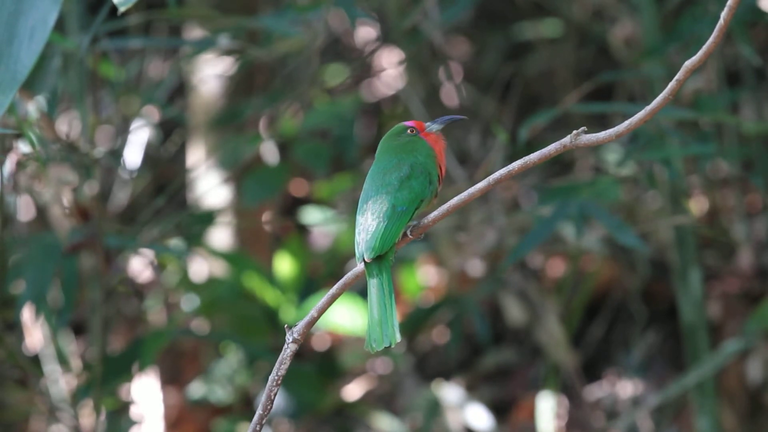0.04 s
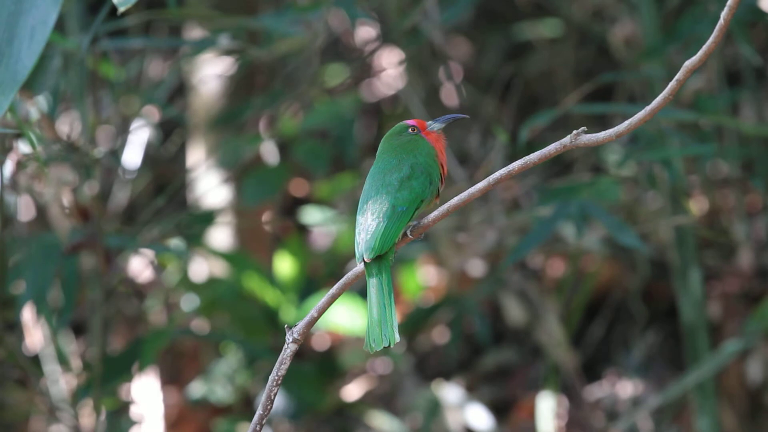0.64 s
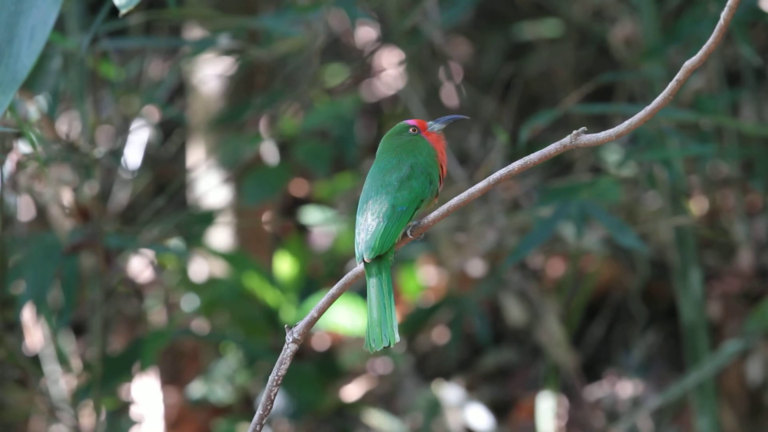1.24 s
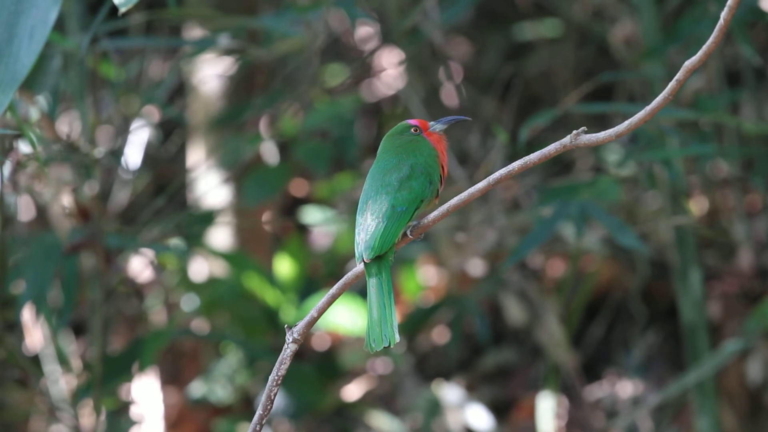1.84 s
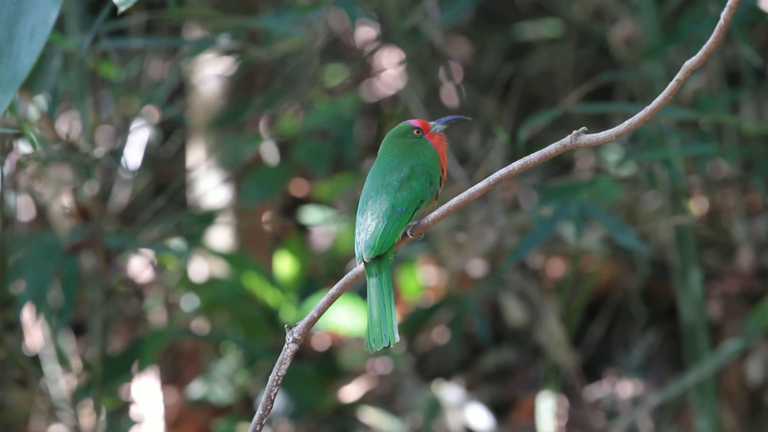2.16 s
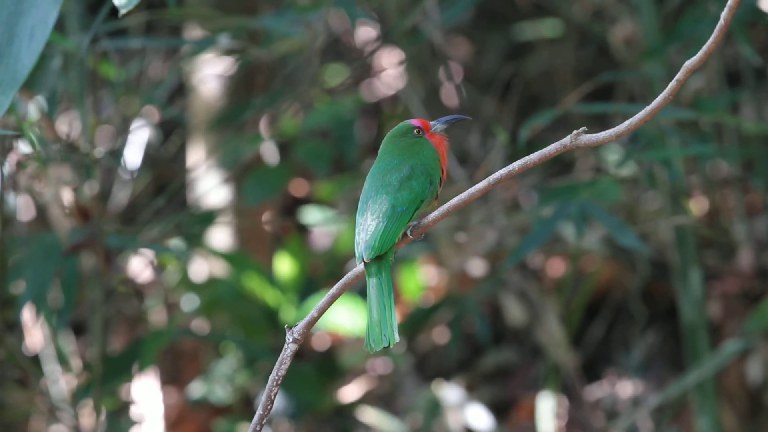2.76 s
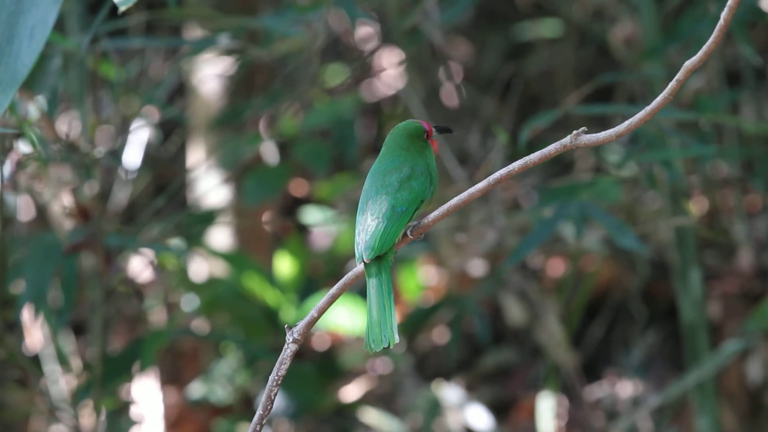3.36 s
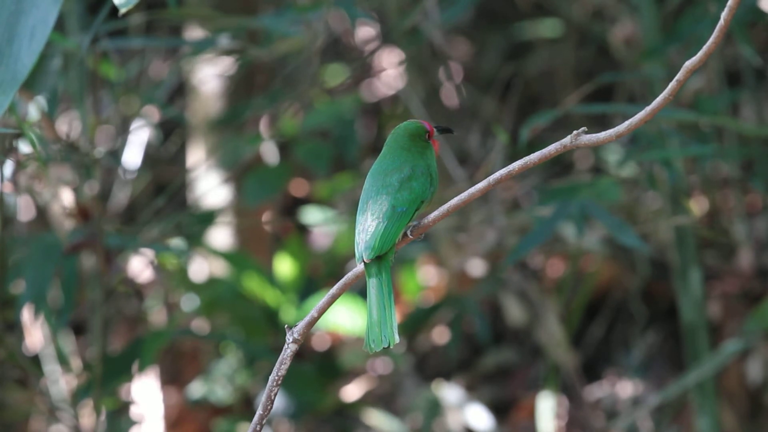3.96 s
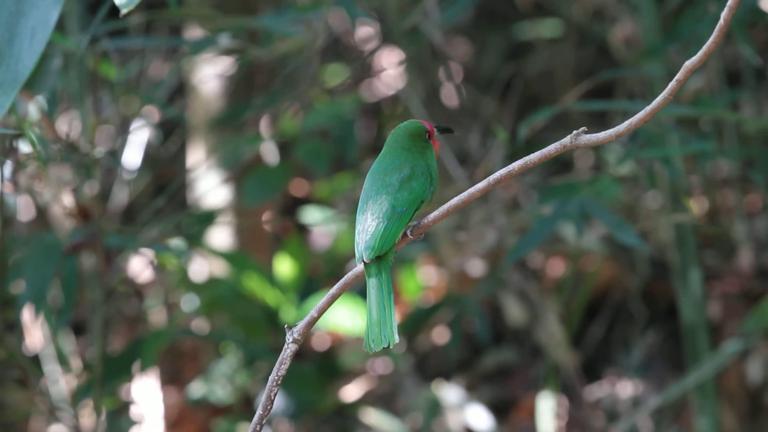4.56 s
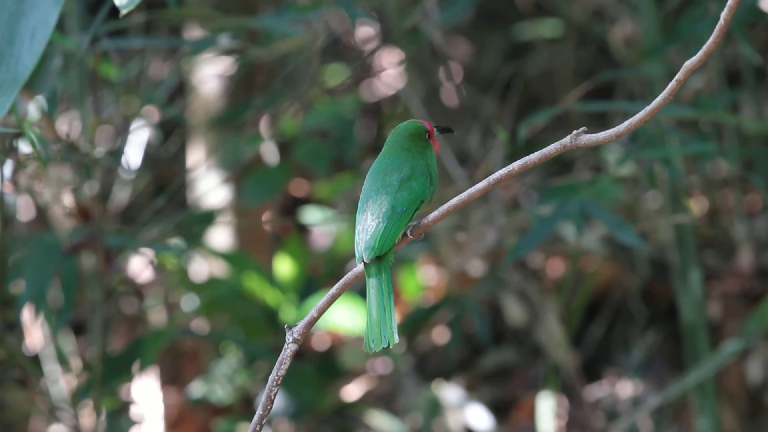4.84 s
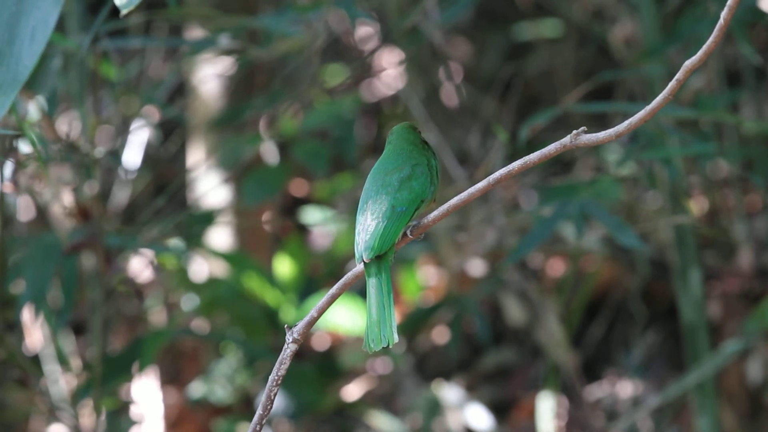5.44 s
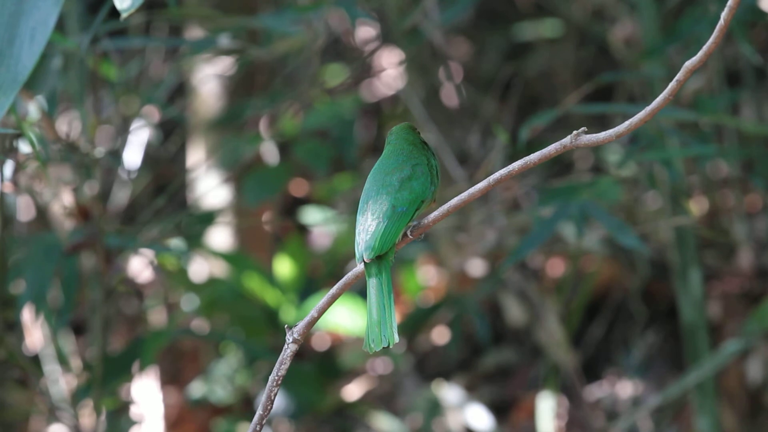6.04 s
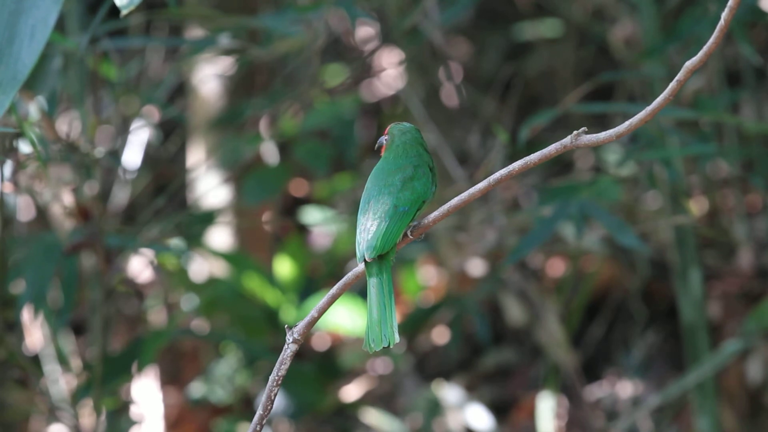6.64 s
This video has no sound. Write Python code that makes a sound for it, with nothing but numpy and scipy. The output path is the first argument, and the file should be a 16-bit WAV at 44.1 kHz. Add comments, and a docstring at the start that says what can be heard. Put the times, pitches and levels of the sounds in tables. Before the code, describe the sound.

A loud, high cicada chorus buzzes steadily in a forest, a few near insects over a haze of distant ones. Early on a stick knocks, and about a second later dry wood gives a brief crunch. Far birds add very faint pips and slurred whistles, and near the end a closer bird whistles one short phrase. A low woodland murmur and soft dull bumps lie underneath, all heard in mono from one microphone.

```python
"""A chorus of cicadas buzzes in a forest, in mono: a few near ones over a haze of far ones.
Each near cicada buckles a tymbal, whose clicks ring its body. A stick knocks, then dry wood
crunches as its fibres break. A bird whistles one short phrase; far birds give soft pips and
slurred, mostly rising whistles. Under it all lie dull bumps and the low murmur of the woods."""
import sys
import numpy as np
from scipy import signal
from scipy.fft import rfft, irfft, next_fast_len
from scipy.io import wavfile
from scipy.ndimage import uniform_filter1d, map_coordinates

SR = 44100
rng = np.random.default_rng(int(sys.argv[2]) if len(sys.argv) > 2 else 0)


def log_audio(samples):
    """Write samples as a 16-bit WAV file to the path given in sys.argv[1]."""
    # one column per channel
    frames = np.atleast_2d(samples).T
    # limit to full scale, then quantise
    limited = np.clip(frames, -1, 1)
    pcm = np.round(limited * 32767).astype(np.int16)
    wavfile.write(sys.argv[1], SR, pcm)


N = 295470


def amp(db):
    """Decibels to gain."""
    return 10 ** (np.asarray(db) / 20)


def unit(x):
    """Scale to rms 1."""
    return x / np.sqrt(np.mean(x ** 2) + 1e-20)


def along(points, hz):
    """Interpolate (Hz, value) points on a log frequency axis."""
    point_hz, values = np.transpose(points)
    return np.interp(np.log(hz + 1), np.log(point_hz + 1), values)


def wobble(knots_per_s):
    """Smooth random curve, N samples."""
    knots = rng.standard_normal(int(N * knots_per_s / SR) + 4)
    return map_coordinates(knots, [np.arange(N) * knots_per_s / SR])


def filtered(x, response):
    """x through a gain given as a function of Hz."""
    size = next_fast_len(N + SR // 2)
    return irfft(rfft(x, size) * response(np.fft.rfftfreq(size, 1 / SR)), size)[:N]


def coloured(x, spectrum):
    """x through a (Hz, dB) spectrum."""
    return filtered(x, lambda hz: amp(along(spectrum, hz)))


def resonant(x, modes):
    """x through parallel (Hz, width Hz, dB) resonances of alternating sign."""
    def response(hz):
        return sum((-1) ** k * amp(db) * 1j * hz * width / (centre ** 2 - hz ** 2 + 1j * hz * width)
                   for k, (centre, width, db) in enumerate(modes))
    return filtered(x, response)


def add(track, start_s, sound):
    """Mix a sound into a track."""
    part = track[round(start_s * SR):][:len(sound)]
    part += sound[:len(part)]


def haze(spectrum, patchy_db):
    """Coloured noise of rms 1, its gain varying in random time-frequency patches."""
    cells = signal.stft(rng.standard_normal(N), nperseg=512)[2]
    patches = uniform_filter1d(rng.standard_normal(cells.shape), size=5, axis=0)
    patches = unit(uniform_filter1d(patches, size=16, axis=1))
    noise = signal.istft(cells * amp(patchy_db * patches), nperseg=512)[1][:N]
    return unit(coloured(noise, spectrum))


def among_trees(x, wet_db):
    """Direct sound plus scatter from trunks and leaves, at unchanged total power."""
    # Forest decay. Each row: frequency in Hz, T60 in seconds.
    decay_times = [(200, 0.6), (2000, 0.87), (8000, 0.4), (15000, 0.18)]
    hz, t, cells = signal.stft(rng.standard_normal(SR // 2), SR, nperseg=256)
    decay = amp(-60 * t / along(decay_times, hz)[:, None])
    tail = signal.istft(cells * decay, SR, nperseg=256)[1]
    scatter = signal.fftconvolve(x, tail / np.linalg.norm(tail))[:N]
    return (x + amp(wet_db) * scatter) / np.hypot(1, amp(wet_db))


def off_trunks(x, echo_db, spread_s=0.02, count=12):
    """Near trunks return weak early copies that ripple the spectrum; output rms 1."""
    delays_s = rng.uniform(spread_s / 10, spread_s, count)
    gains = rng.choice([-1, 1], count) / np.sqrt(count)
    out = x.copy()
    for delay_s, gain in zip(delays_s, gains):
        add(out, delay_s, amp(echo_db) * gain * x)
    return unit(out)


def murmur():
    """Low, steady noise of the woods."""
    # Each row: frequency in Hz, relative density in dB.
    spectrum = [(20, -42), (42, -30), (58, -12), (70, -13.5), (150, -6), (275, 0.5), (335, -5), (410, 0),
                (590, 1.5), (700, -5.5), (1000, -2.5), (1800, -7.5), (3000, -7.5), (8000, -34)]
    return amp(-57.5) * haze(spectrum, patchy_db=1.0)


def bumps(rise_s=0.0072):
    """Dull, soft-edged bumps in the undergrowth, each in one rounded resonance."""
    # Each row: start in seconds, relative level in dB, pitch in Hz, width in Hz.
    events = [(2.418, -49, 785, 150), (4.335, -55, 350, 140), (4.435, -51, 413, 150),
              (4.713, -45, 424, 130), (5.562, -48.5, 895, 1500), (5.7, -52.5, 440, 170),
              (5.8, -50.5, 835, 400), (6.07, -53, 370, 130), (6.165, -50.5, 598, 120)]
    out = np.zeros(N)
    u = np.arange(SR // 10) / SR / rise_s
    envelope = u * np.exp(-u)
    for start_s, db, pitch_hz, width_hz in events:
        body = filtered(rng.standard_normal(N), lambda hz: np.exp(-(2 * (hz - pitch_hz) / width_hz) ** 2))
        add(out, start_s, amp(db - 12) * unit(envelope * body[:len(u)]))
    return among_trees(out, wet_db=-7.5)


def note(length_s, start_hz, end_hz, bend_hz, arch, waver, flutter_db):
    """Pure glide quavering in pitch and level; arch 0 is flat-topped, 1 a rounded swell."""
    u = np.linspace(0, 1, int(length_s * SR))
    glide_hz = start_hz + (end_hz - start_hz) * u + bend_hz * (1 - (2 * u - 1) ** 2)
    cycles = np.cumsum(glide_hz * (1 + waver * wobble(120)[:len(u)])) / SR
    envelope = np.abs(np.sin(np.pi * u)) ** arch * amp(flutter_db * wobble(90)[:len(u)])
    return envelope * np.sin(2 * np.pi * cycles)


def far_whistles():
    """Drawn-out bird slurs that level off, heard mostly as echo."""
    # Each row: start in seconds, length in seconds, level in dB, start and end pitch in Hz.
    slurs = [(1.46, 0.44, -65, 1070, 1400), (1.35, 1.49, -65, 2055, 2047), (1.53, 0.5, -61, 2050, 2420),
             (3.3, 0.2, -60, 2750, 2600), (3.7, 0.95, -66.5, 1020, 1205)]
    out = np.zeros(N)
    for start_s, length_s, db, start_hz, end_hz in slurs:
        bend_hz = 0.25 * (end_hz - start_hz)
        slur = note(length_s, start_hz, end_hz, bend_hz, arch=0.44, waver=0.0158, flutter_db=3.5)
        add(out, start_s, amp(db) * slur)
    return among_trees(out, wet_db=4.0)


def far_pips(pitch_hz=993, length_s=0.0153, fall=0.13):
    """Very short falling notes of far birds, all on one pitch."""
    # Each row: centre time in seconds, relative level in dB.
    events = [(0.778, -45), (0.866, -48), (1.252, -43), (1.427, -46), (1.723, -44.5), (1.964, -45),
              (2.314, -45), (2.639, -45.5), (3.664, -46), (4.174, -44.5), (4.343, -43.5), (4.584, -46),
              (6.093, -45), (6.334, -45.5), (6.477, -43)]
    u = np.linspace(0, 1, int(length_s * SR))
    glide_hz = pitch_hz * (1 + fall * (1 - 2 * u))
    pip = np.sin(np.pi * u) ** 2 * np.sin(2 * np.pi * np.cumsum(glide_hz) / SR)
    out = np.zeros(N)
    for centre_s, db in events:
        add(out, centre_s - length_s / 2, amp(db) * pip)
    return amp(-3.5) * among_trees(out, wet_db=-20)


def birdsong():
    """Clear notes of a nearer bird, each one bent glide, heard mostly direct."""
    # Each row: start and length in seconds, level in dB, start pitch, end pitch and mid bend in Hz.
    notes = [(0.018, 0.097, -57.5, 557, 880, -53), (0.18, 0.15, -55, 770, 934, -58),
             (4.92, 0.073, -59, 2020, 1930, -82), (5.221, 0.058, -51, 2080, 2170, -180),
             (5.265, 0.078, -45, 2100, 2370, 250), (5.368, 0.044, -49.5, 2150, 1990, 20),
             (5.419, 0.053, -42, 3450, 2870, -280), (5.555, 0.056, -42.5, 2850, 3310, -20),
             (5.625, 0.045, -49.5, 3100, 1790, -200)]
    out = np.zeros(N)
    for start_s, length_s, db, start_hz, end_hz, bend_hz in notes:
        glide = note(length_s, start_hz, end_hz, bend_hz, arch=0.51, waver=0.016, flutter_db=2.5)
        add(out, start_s, amp(db) * glide)
    return among_trees(out, wet_db=-13)


def crunch(start_s=2.11, swell_s=0.035, fibres_per_s=900, grow_db_per_s=170, fade_db_per_s=290):
    """Tiny fibre breaks that come ever harder, then die away."""
    t = np.arange(N) / SR - start_s
    past_peak_s = t - swell_s
    breaks = (rng.random(N) < fibres_per_s / SR) * rng.choice([-1, 1], N)
    sizes = amp(2.5 * rng.standard_normal(N))
    envelope_db = np.minimum(grow_db_per_s * past_peak_s, -fade_db_per_s * past_peak_s)
    return (t > 0) * amp(envelope_db - 38) * unit(breaks * sizes)


def dry_wood(snap_t60_s=0.026):
    """Snaps and breaking fibres ring the wood and throw off brighter splinters."""
    # Wood resonances. Each row: centre in Hz, width in Hz, relative gain in dB.
    modes = [(220, 130, -17), (410, 35, -2.5), (890, 160, -3.5), (1110, 83, 1), (1330, 200, 0.5),
             (1556, 130, 0), (2020, 200, -10), (2360, 170, -24)]
    # Each row: frequency in Hz, relative gain in dB.
    splinter_spectrum = [(500, -33), (1500, -4), (2400, -2), (3500, 1.5), (6000, -7), (9000, -12)]
    # Each row: start in seconds, relative level in dB, splinter share in dB.
    snaps = [(1.272, -35.5, 3.5), (1.277, -38, -10), (1.286, -44, -4), (1.299, -39.5, -5),
             (2.14, -33.5, -0.5), (2.1629, -27, -13), (2.168, -31, -12), (2.174, -35, -12),
             (2.194, -35, -18)]
    t = np.arange(SR // 8) / SR
    blows = crunch()
    splinters = amp(-5.5) * crunch()
    for start_s, db, splinter_db in snaps:
        decay = amp(db - 60 * t / snap_t60_s)
        add(blows, start_s, decay * rng.standard_normal(len(t)))
        add(splinters, start_s, amp(splinter_db) * decay * rng.standard_normal(len(t)))
    cracks = resonant(blows, modes) + coloured(splinters, splinter_spectrum)
    return among_trees(amp(14) * cracks, wet_db=-18)


def low_cicadas():
    """A far, low-pitched kind merges into haze; it swells and tires, and a ring and a hiss follow."""
    # Each row: time in seconds, effort in dB.
    effort = [(0.0, -36.5), (0.09, -37), (1.85, -35.5), (1.88, -37.5), (2.33, -36), (2.97, -40),
              (3.23, -37), (3.6, -39.5), (4.63, -40.5), (4.96, -42), (5.17, -40.5), (5.56, -43),
              (6.23, -39.5), (6.55, -42.5), (6.7, -41.5)]
    # Chorus, one insect's ring, high hiss. Each row: frequency in Hz, relative density in dB.
    chorus_spectrum = [(1500, -45), (2200, -23), (2800, -16), (3100, -11.5), (3420, -4), (4000, -2),
                       (4350, -4.5), (4570, -4), (4850, -3), (5150, -3), (6300, -9), (7500, -17.5),
                       (10000, -42)]
    ring_spectrum = [(3000, -50), (3750, -18), (3900, -6), (4020, -9), (4130, -3), (4255, 0), (4360, -4),
                     (4500, -20), (5500, -50)]
    hiss_spectrum = [(10000, -32.5), (12200, -4.5), (13200, -0.5), (14300, 4.5), (15100, 1.5), (15700, -20)]
    effort_db = np.interp(np.arange(N) / SR, *np.transpose(effort))
    swell_db = effort_db - effort_db.mean()
    chorus = off_trunks(haze(chorus_spectrum, patchy_db=0.37), echo_db=-8.5)
    chorus *= amp(-38.5 + 0.64 * swell_db)
    ring = amp(-44.5 + 0.97 * swell_db) * haze(ring_spectrum, patchy_db=0.5)
    hiss = amp(-38 + swell_db) * haze(hiss_spectrum, patchy_db=0.5)
    return chorus + ring + hiss


def tymbal(rate_hz, drift=0.0018, jitter_s=9e-6, return_db=-7.5, scatter_db=0.5):
    """Clicks of a tymbal: it buckles once a beat and springs back more softly."""
    beats = np.cumsum(rate_hz * (1 + drift * wobble(2) + drift * wobble(17))) / SR
    buckles = np.arange(1, int(beats[-1]) - 1)
    click_beats = np.array([buckles, buckles + rng.uniform(0.38, 0.507)])
    at_samples = np.interp(click_beats, beats, np.arange(N))
    at_samples += jitter_s * SR * rng.standard_normal(click_beats.shape)
    sizes = amp(np.array([[0], [return_db]]) + scatter_db * rng.standard_normal(click_beats.shape))
    # A windowed sinc places each click between samples.
    taps = at_samples.astype(int)[..., None] + np.arange(-7, 9)
    offsets = taps - at_samples[..., None]
    clicks = sizes[..., None] * np.sinc(offsets) * np.sinc(offsets / 8)
    return np.bincount(np.clip(taps, 0, N - 1).ravel(), clicks.ravel(), N)


def main_cicadas(level_db=-29.5):
    """Steady buzz: near insects click through their ringing bodies, far ones merge into haze."""
    # Near cicadas. Each row: tymbal rate in Hz, relative level in dB.
    insects = [(231.8, -2), (223.3, -2.5), (219.4, -4), (224.2, -1.5), (226.5, -3)]
    # Each row: frequency in Hz, relative gain in dB.
    body_spectrum = [(5500, -46), (6800, -17.5), (7200, -6), (7600, -1.5), (7900, 0), (8800, 0.5),
                     (9400, -4), (10100, -6), (10500, -9.5), (12000, -15.5), (14000, -31)]
    # Sharp resonances of the nearest cicada. Each row: centre in Hz, width in Hz, relative gain in dB.
    shrill_modes = [(7855, 52, -1), (9270, 54, -0.5), (9800, 83, -7.5), (10185, 64, 0)]
    clicks = [amp(db) * unit(tymbal(rate_hz)) for rate_hz, db in insects]
    scattered = sum(among_trees(train, wet_db=-2.5) for train in clicks)
    near = unit(coloured(scattered, body_spectrum))
    shrill = amp(-9.5) * unit(resonant(clicks[0], shrill_modes))
    far = haze(body_spectrum, patchy_db=0)
    return amp(level_db) * unit(near + shrill + far)


def scene():
    """All sources at one microphone, the same in both channels."""
    mono = murmur() + main_cicadas() + low_cicadas() + dry_wood()
    mono += far_pips() + bumps() + birdsong() + far_whistles()
    return np.array([mono, mono])


def record(dry, top_hz=15750):
    """Brick-wall low-pass at the band limit."""
    return np.array([filtered(channel, lambda hz: hz < top_hz) for channel in dry])


dry = scene()
out = record(dry)
log_audio(out)
```